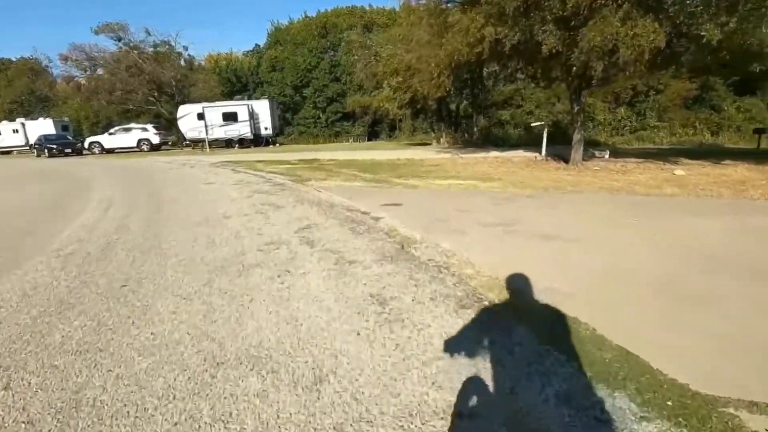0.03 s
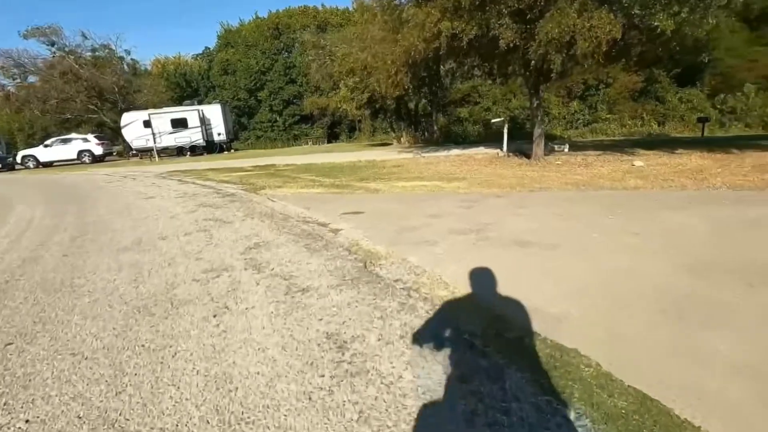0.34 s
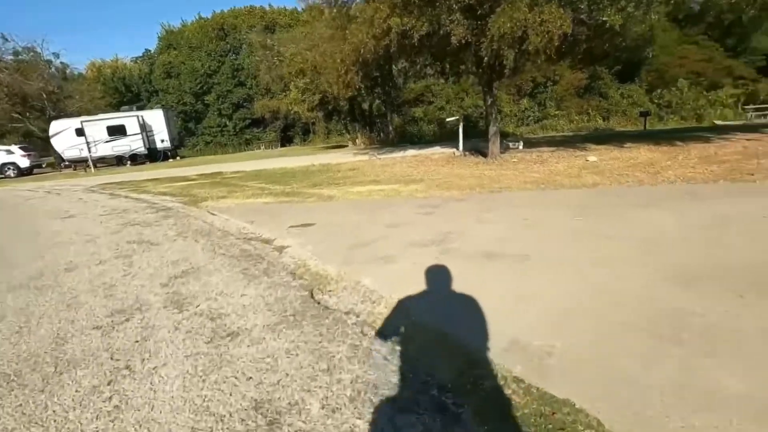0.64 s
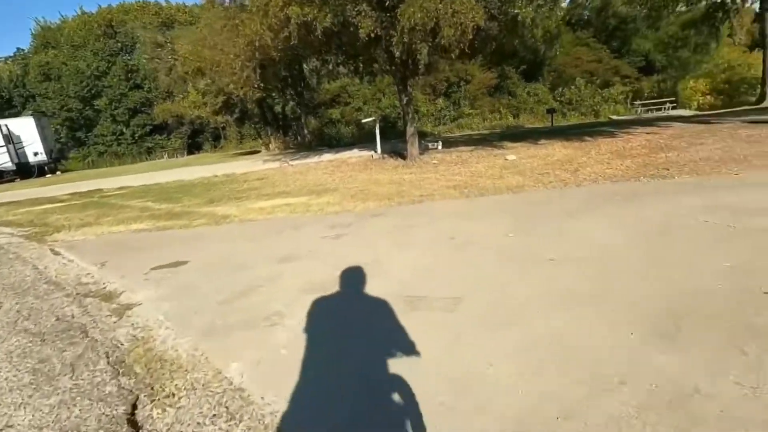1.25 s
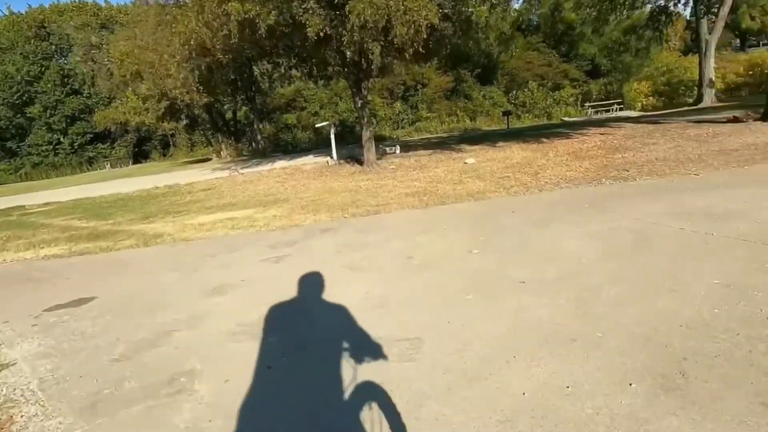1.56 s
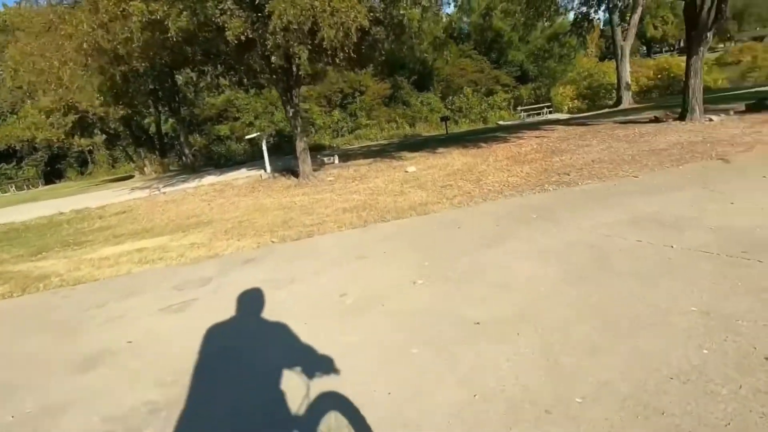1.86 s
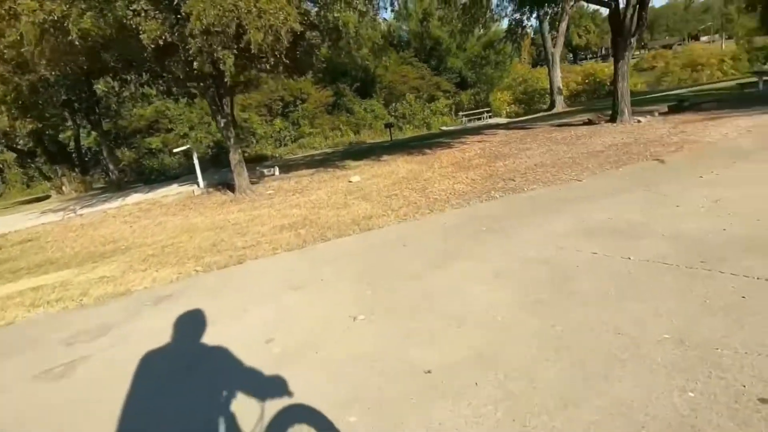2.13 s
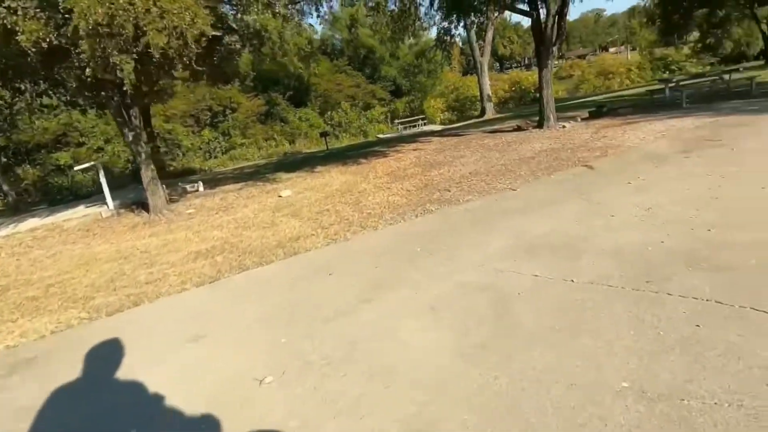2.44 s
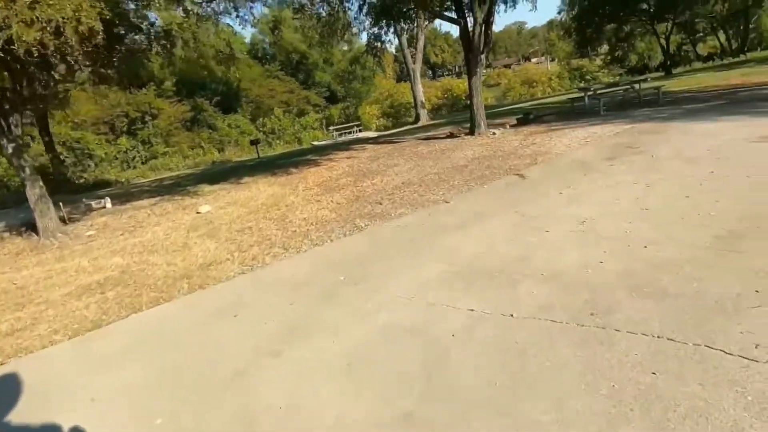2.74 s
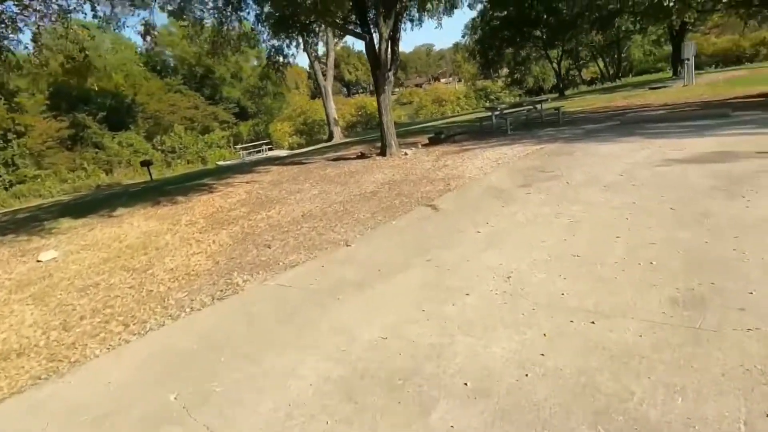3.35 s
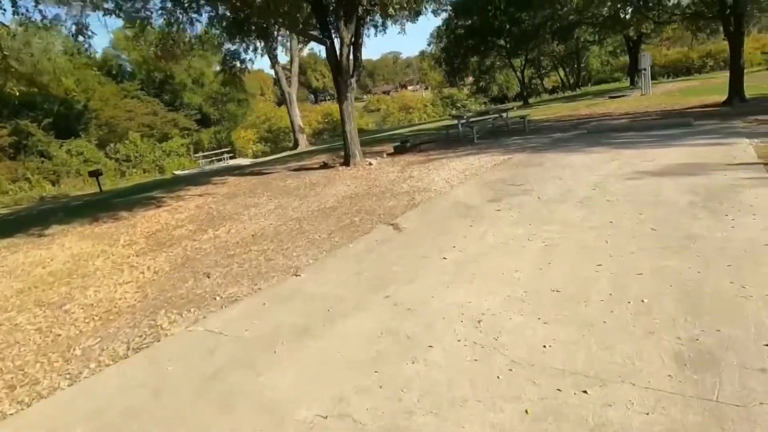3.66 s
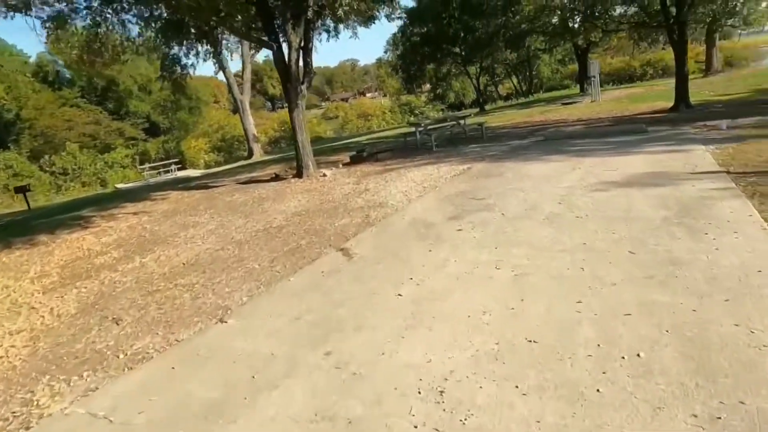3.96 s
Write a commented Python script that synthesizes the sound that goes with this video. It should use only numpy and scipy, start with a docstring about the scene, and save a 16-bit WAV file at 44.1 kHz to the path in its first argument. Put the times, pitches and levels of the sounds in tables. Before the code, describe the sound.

A bicycle brake squeals on one very high, fluttering note from about 0.4 to 0.7 seconds, again from 1.1 to 1.6, and briefly around 3.3 to 3.5. Low wind buffets the rider's microphone throughout, strongest near 1.8 seconds. The tyres rumble on paving with scattered thuds, light rattles and faint ticks of grit, while something on the wheel brushes softly and rapidly.

```python
"""A bicycle brake gives three high squeals while the bike rolls along a paved road in buffeting wind.
The pad rubs the brake into ringing at one pitch: the squeal flutters strongly when quiet
and about half as much when loud. Wind thumps on the rider's microphone and the tyres rumble.
Something on the turning wheel brushes about eleven times a second, the bike rattles,
bumps thud and grit ticks under the tyres."""
import sys
import numpy as np
from scipy import signal
from scipy.fft import rfft, irfft, next_fast_len
from scipy.io import wavfile
from scipy.ndimage import map_coordinates

SR = 44100
rng = np.random.default_rng(int(sys.argv[2]) if len(sys.argv) > 2 else 0)


def int16_out(signal):
    """Quantize to a 16-bit WAV file."""
    q = np.round(np.clip(np.atleast_2d(signal).T, -1, 1) * 32767)
    wavfile.write(sys.argv[1], SR, q.astype(np.int16))


N = 176400  # 4 seconds


def brake(loud_db=-32, blend_db=1, flutter_loud=.38, flutter_base=.06, rasp_depth=.035):
    """The rubbing pad keeps one high note ringing; its strong flutter about halves above loud_db."""
    # the brake's note: t/s, f/Hz
    pitch = [(.38, 8435), (.43, 8398), (.46, 8428), (.495, 8395), (.54, 8445), (.595, 8470), (.69, 8410),
             (.72, 8440), (.8, 8380), (1.04, 8480), (1.1, 8505), (1.13, 8435), (1.37, 8432), (1.395, 8410),
             (1.43, 8445), (1.475, 8438), (1.495, 8505), (1.535, 8510), (1.575, 8555), (1.68, 8510),
             (3.32, 8405), (3.35, 8360), (3.38, 8380), (3.405, 8425), (3.435, 8432), (3.47, 8480),
             (3.56, 8455)]
    # loudness, one list for each squeal: t/s, level/dB
    squeals = [
        [(0.35, -92), (0.388, -50), (0.438, -41), (0.462, -31.5), (0.482, -44), (0.494, -37), (0.512, -33.5),
         (0.572, -34.5), (0.588, -37.5), (0.616, -35), (0.63, -44), (0.644, -33.5), (0.658, -47.5),
         (0.68, -34.5), (0.73, -48), (0.83, -68.5)],
        [(1.02, -74), (1.08, -51), (1.1, -51.5), (1.122, -39.5), (1.144, -37.5), (1.158, -49), (1.168, -39),
         (1.192, -30), (1.212, -40.5), (1.232, -35), (1.262, -42), (1.316, -35.5), (1.484, -27), (1.526, -34),
         (1.548, -50), (1.562, -48.5), (1.59, -49), (1.605, -64), (1.69, -63.5)],
        [(3.27, -87), (3.288, -77), (3.324, -40.5), (3.334, -35), (3.348, -48), (3.402, -31), (3.432, -29),
         (3.442, -33.5), (3.454, -57.5), (3.468, -48.5), (3.498, -63), (3.56, -75)],
    ]
    out, t = np.zeros(N), np.arange(N) / SR
    pitch_hz = curve(pitch) + 7 * wobble(50)  # wanders with the pad's pressure
    note = np.sqrt(2) * np.exp(2j * np.pi * np.cumsum(pitch_hz) / SR)
    side = np.exp(2j * np.pi * 3897 * t)  # adds weak tones 3897 Hz below and above the note
    # the recorder mirrors the squeal into a faint high copy (an alias) that moves against its pitch
    mirror = np.exp(-2j * np.pi * 24000 * t)
    tone = note * (1 + amp(-27) / side + amp(-33) * side + amp(-39.3) * mirror)
    flutter = unit(wobble(140) + 1j * wobble(140))  # shakes both loudness and pitch
    rasp = unit(wobble(450) + 1j * wobble(450))  # the pad's finer roughness
    for rows in squeals:
        level_db = curve(rows)
        fade = np.clip(np.minimum(t - rows[0][0], rows[-1][0] - t) / 0.0092, 0, 1)
        unrest = (3 - np.tanh((level_db - loud_db) / blend_db / 2)) / 2  # 2 when quiet, 1 when loud
        depth = flutter_base + (flutter_loud - flutter_base) * unrest
        shake = (1 + depth * flutter + rasp_depth * unrest * rasp) / np.sqrt(1 + depth ** 2)
        out += fade * amp(level_db) * (shake * tone).real
    return out


def outdoor_echo(sound, echo_db=-30, t60_s=.54):
    """A thin, blurred outdoor echo that fades by 60 dB in t60_s."""
    t = np.arange(SR // 2) / SR
    tail = rng.standard_normal(len(t)) * amp(-60 * t / t60_s) * (1 - np.exp(-t / 0.029))
    return amp(echo_db) * signal.fftconvolve(sound, tail / np.linalg.norm(tail))[:N]


def wind(lumps_db=-1.0, eddies_db=1):
    """Swirling air hits the microphone: deep buffeting, low gusts and rougher puffs."""
    # strength of each layer: t/s, level/dB
    buffet_levels = [(0.0, -32), (0.42, -33), (0.46, -37.5), (0.59, -26.5), (0.7, -32.5), (0.78, -25.5),
                     (0.96, -35), (1.0, -31), (1.58, -30.5), (1.66, -21.5), (1.76, -34), (1.8, -19),
                     (1.93, -30.5), (3.01, -32), (3.05, -46), (3.14, -34), (3.21, -42.5), (3.3, -28),
                     (3.61, -34.5), (3.65, -28), (3.97, -31), (4.0, -24.5)]
    gust_levels = [(0.0, -35.5), (0.24, -33.5), (0.4, -36.5), (0.43, -29), (0.66, -36), (0.7, -32),
                   (1.38, -30.5), (1.51, -40), (1.74, -30), (1.79, -51), (1.82, -30), (2.13, -36.5),
                   (2.18, -27), (2.21, -30), (2.95, -39), (3.56, -34.5), (3.64, -33), (3.85, -47),
                   (3.91, -34), (4.0, -33)]
    puff_levels = [(0, -43), (.2, -42.5), (.23, -39.5), (.36, -47), (.39, -38), (.51, -48), (.6, -41),
                   (.65, -39.5), (.79, -37.5), (.88, -35), (.97, -39), (1.04, -32.5), (1.15, -40.5),
                   (1.21, -30), (1.29, -41), (1.41, -37), (1.46, -55), (1.54, -40), (1.58, -45),
                   (1.62, -36), (1.72, -38), (1.92, -44.5), (2.0, -35.5), (2.07, -49.5), (2.24, -39.5),
                   (2.52, -43.5), (2.64, -41), (2.73, -46), (3.05, -46), (3.3, -46.5), (3.66, -47.5),
                   (3.85, -48.5), (4, -51)]
    # tone colour of each layer: f/Hz, level/dB
    buffet_colour = [(10, -17.5), (24, -2.5), (32, -8), (44, 2.5), (58, -4), (85, -21.5), (160, -35),
                     (400, -125)]
    gust_colour = [(35, -28), (70, 3), (100, 2), (140, -2), (190, -16.5), (300, -32), (1000, -120)]
    puff_colour = [(100, -24.5), (170, 1.5), (240, -1), (330, -8), (420, -16), (520, -23.5), (900, -35.5),
                   (3000, -110)]
    buffet = amp(curve(buffet_levels)) * noise(buffet_colour)
    gusts = amp(curve(gust_levels)) * unit(noise(gust_colour) * amp(lumps_db * wobble(9)))
    puffs = amp(curve(puff_levels)) * unit(noise(puff_colour) * amp(eddies_db * wobble(24.69)))
    return buffet + gusts + puffs


def tyres(roll_boost_db=1.5, grain_db=0.97, patches_db=0.9):
    """Tyres rumble on uneven paving, with a swelling ring, a low hum and a faint hiss."""
    # strength of the rumble, the hum and the ring's swell: t/s, level/dB
    roll_levels = [(0.0, -53.5), (0.82, -53), (1.18, -51), (1.65, -50.5), (2.18, -50), (2.55, -54),
                   (2.86, -55), (3.23, -52), (3.72, -53), (4.0, -53)]
    hum_levels = [(0, -52.5), (1.2, -56), (2.4, -50.5), (3, -45.5), (4, -47)]
    ring_swell = [(0, -7), (1.2, -5.5), (1.5, 6), (1.8, -6), (2.02, 8.5), (2.25, 3), (2.45, -10), (3.2, -9),
                  (3.8, 3), (4, -5)]
    # tone colours: f/Hz, level/dB
    roll_colour = [(120, -2.5), (300, 3.5), (480, 0.5), (750, -3.5), (1300, -7), (2000, -11.5),
                   (2800, -14.5), (3700, -19), (4600, -24), (8000, -37), (16000, -69)]
    hum_colour = [(120, -20.5), (172, 11.5), (212, -25), (300, -8), (372, 2), (430, -6), (505, -3.5),
                  (600, -16), (1200, -48)]
    hiss_colour = [(1500, -20), (4000, -9.5), (5300, 3), (6600, -0.5), (8300, 3), (9300, -9), (10300, -9),
                   (11300, -15.5), (15800, -8.5)]
    # the tyres' ring before its swell: f/Hz, width/Hz, level/dB
    ring_band = [(3450, 150, -74)]
    surface = amp(grain_db * wobble(120) + patches_db * wobble(12))
    roll = amp(curve(roll_levels) + roll_boost_db) * unit(noise(roll_colour) * surface)
    ring = amp(curve(ring_swell)) * ringing(ring_band)
    hum = amp(curve(hum_levels)) * noise(hum_colour)
    hiss = amp(-75) * noise(hiss_colour)
    return roll + ring + hum + hiss


def grit_and_bumps():
    """The tyres tick over grit and thud over bumps."""
    # each tick and thud: t/s, level/dB, f/Hz, time to fade by 60 dB/s
    grit = [(1.503, -57, 5470, 0.035), (2.826, -66, 7400, .02), (2.841, -64, 14500, 0.0089),
            (2.84, -59, 7300, .012), (2.893, -63, 5700, .025), (2.899, -66, 14000, .005),
            (2.944, -66, 12000, .006), (2.954, -53.5, 6560, 0.011), (2.985, -71, 14000, 0.0044),
            (3.095, -68, 13000, .005), (3.242, -66, 12500, 0.0056), (3.256, -58, 14000, 0.0047),
            (3.403, -61, 5700, .02), (3.556, -60.5, 9800, .014)]
    bumps = [(.775, -23, 91, 0.05), (1.015, -29, 167, 0.17), (1.62, -43.5, 496, 0.11),
             (1.81, -24.5, 67, 0.22), (2.612, -35, 255, 0.15), (2.175, -25, 110, 0.045),
             (3.64, -25, 89, 0.14)]
    return knocks(grit, octaves=.27, rise_s=0.00013) + knocks(bumps, octaves=0.61, rise_s=0.0028)


def rattles(top_hz=4020):
    """Parts of the bike knock together, with little sound above top_hz."""
    # each knock: t/s, level/dB, f/Hz, time to fade by 60 dB/s
    hits = [(.621, -44.5, 1440, 0.031), (.845, -56, 2240, 0.075), (1.007, -46.5, 2680, 0.056),
            (1.215, -51, 1540, 0.19), (1.366, -40, 1500, 0.028), (1.545, -52, 2220, 0.14),
            (2.008, -49.5, 3400, 0.043), (3.265, -48.5, 2460, 0.021), (3.732, -58, 2400, 0.034)]
    return filtered(knocks(hits, octaves=.68, rise_s=.003), lambda hz: 1 / (1 + (hz / top_hz) ** 10))


def brushing(width_turns=0.13, slip_turns=.05, grain_db=3, scatter_db=1.1):
    """Something on the wheel brushes once a turn: a light, scratchy swish that makes metal ring."""
    # how far the brushing part has turned: t/s, angle/turns
    rotation = [(-.035, -1), (1.975, 21), (2.265, 24), (2.71, 28), (3.187, 33), (4.005, 42)]
    # tone colour of the scratch: f/Hz, level/dB
    scratch_colour = [(800, -28), (1900, 1), (2800, 1), (3700, -2), (4600, -10), (5700, -10.5), (6800, -11),
                      (8300, -11), (9300, -14.5), (11400, -29.5), (13000, -22.5), (15800, -35)]
    # two notes of the metal: f/Hz, width/Hz, level/dB
    metal_rings = [(8300, 280, -79), (12220, 190, -85.5)]
    turns = curve(rotation) + slip_turns * wobble(13)
    contact = np.exp(-.5 * ((turns - np.round(turns)) / width_turns) ** 2)
    scratch = unit(noise(scratch_colour) * amp(grain_db * wobble(340)))
    strength = amp(scatter_db * wobble(8))
    return strength * contact * (amp(-63.5) * scratch + ringing(metal_rings))


def rings_and_whine():
    """The bike rings faintly; the recorder's electronics add a thin, steady whine."""
    # three rings of the bike, then the electronic whine: f/Hz, width/Hz, level/dB
    bands = [(787.6, 11, -71.5), (1490, 140, -72.5), (2660, 120, -76), (14145, 8, -94.5)]
    return ringing(bands)


def knocks(rows, octaves, rise_s):
    """Knocks that die quickly: each is a burst of noise in one broad band of pitch."""
    out, t = np.zeros(N + SR), np.arange(SR // 4) / SR
    for start_s, db, centre_hz, t60_s in rows:
        burst = filtered(rng.standard_normal(len(t)),
                         lambda hz: np.exp(-.5 * (np.log2((hz + 1) / centre_hz) / octaves) ** 2))
        shape = (1 - np.exp(-t / rise_s)) ** 2 * amp(-60 * t / t60_s)
        gain = amp(db) * np.sqrt(np.mean(shape ** 2)) / shape.max()  # db is the loudest moment
        out[round(start_s * SR):][:len(t)] += gain * unit(burst * shape)
    return out[:N]


def ringing(bands):
    """Narrow bands of pitch kept ringing by random noise."""
    out = np.zeros(N)
    for centre_hz, width_hz, db in bands:
        ring = filtered(rng.standard_normal(N), lambda hz: 1 / (1 + ((hz - centre_hz) / width_hz) ** 2))
        out += amp(db) * unit(ring)
    return out


def noise(colour):
    """Noise of strength 1, coloured by rows of f/Hz, level/dB."""
    f, db = np.transpose(colour)
    white = rng.standard_normal(N)
    return unit(filtered(white, lambda hz: amp(np.interp(np.log(hz + 1), np.log(f), db))))


def filtered(x, response):
    """Scale each frequency in x by response(hz)."""
    size = next_fast_len(len(x) + 8192)
    return irfft(rfft(x, size) * response(np.fft.rfftfreq(size, 1 / SR)), size)[:len(x)]


def wobble(rate):
    """A smooth curve through `rate` random points a second."""
    points = rng.standard_normal(4096)
    return map_coordinates(points, [np.arange(N) * rate / SR], mode="wrap")


def curve(rows):
    """Join (time, value) points with straight lines, one value per sample."""
    times, values = np.transpose(rows)
    return np.interp(np.arange(N) / SR, times, values)


def amp(db):
    """Turn decibels into a gain."""
    return 10 ** (np.asarray(db) / 20)


def unit(x):
    """Scale to an average strength (rms) of 1."""
    return x / np.sqrt(np.mean(np.abs(x) ** 2) + 1e-20)


def scene():
    """Brake, wind and the noises of rolling, in one channel."""
    squeal = brake()
    clatter = rattles() + grit_and_bumps()
    return (squeal + outdoor_echo(squeal) + wind() + tyres() + rings_and_whine() + brushing() + clatter)[None]


def record(dry, top_hz=15850):
    """The rider's camera picks up nothing above top_hz."""
    return filtered(dry[0], lambda hz: hz < top_hz)[None]


dry = scene()
out = record(dry)
int16_out(out)
```